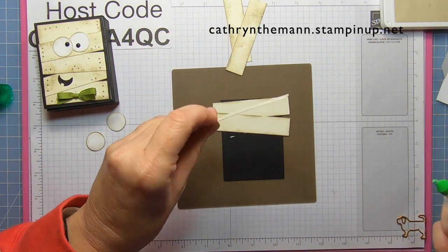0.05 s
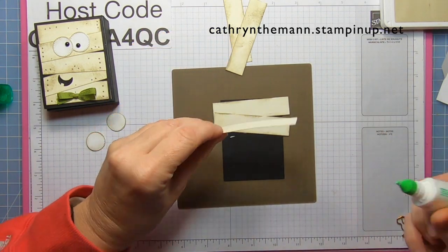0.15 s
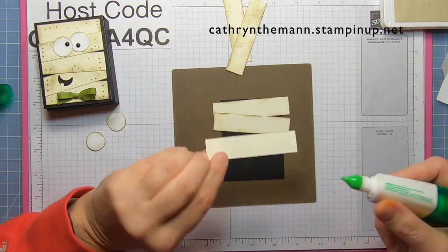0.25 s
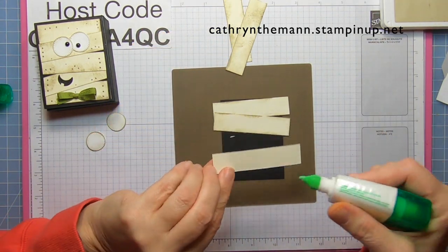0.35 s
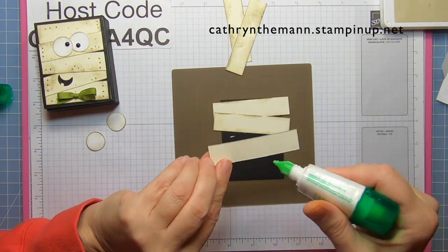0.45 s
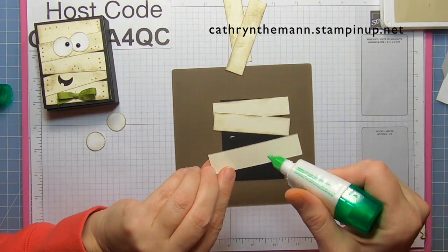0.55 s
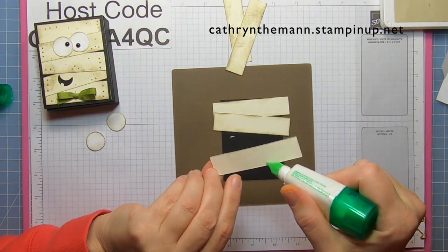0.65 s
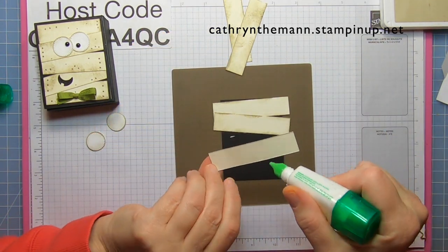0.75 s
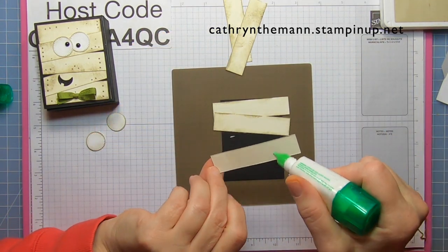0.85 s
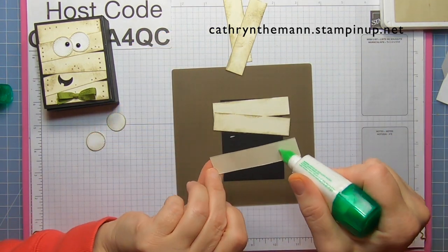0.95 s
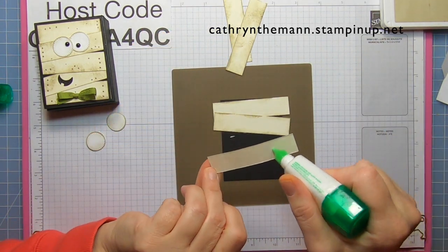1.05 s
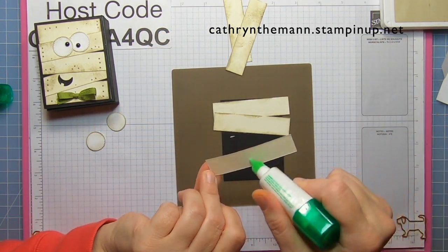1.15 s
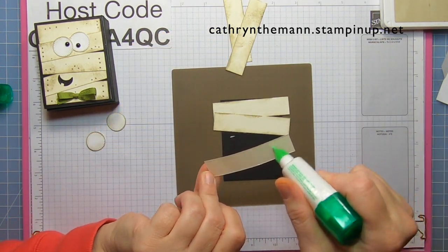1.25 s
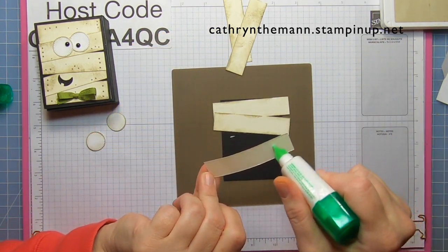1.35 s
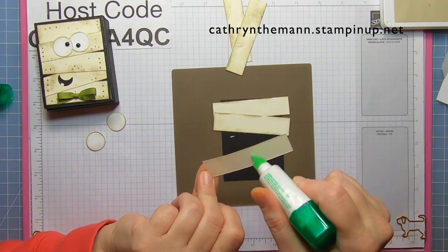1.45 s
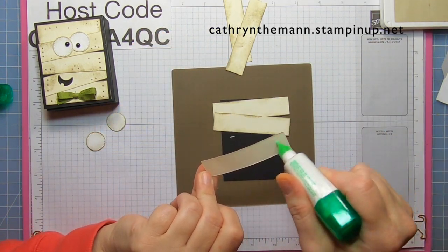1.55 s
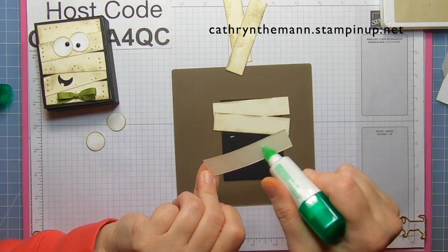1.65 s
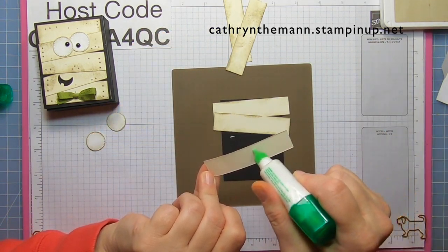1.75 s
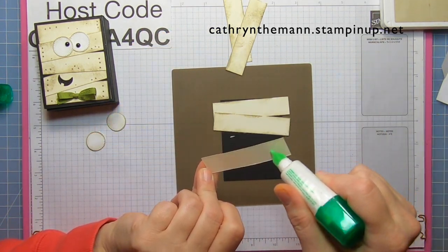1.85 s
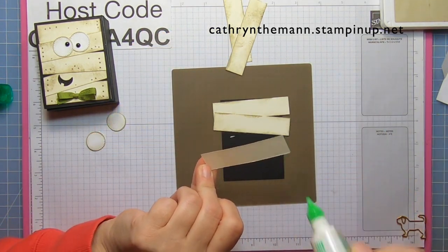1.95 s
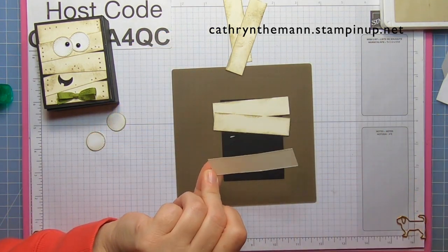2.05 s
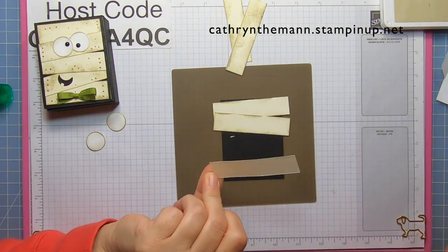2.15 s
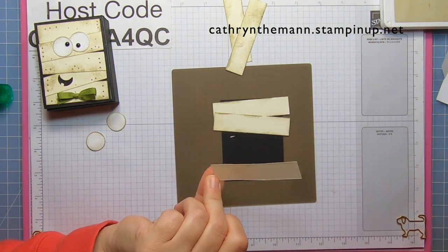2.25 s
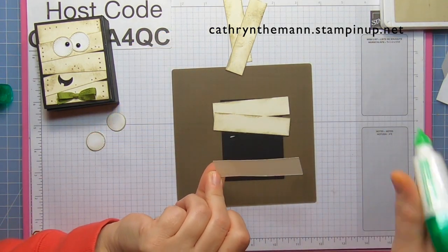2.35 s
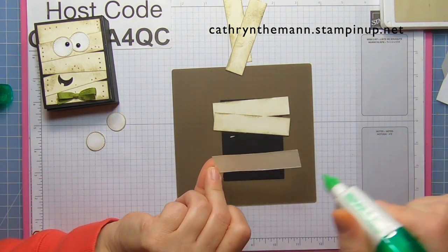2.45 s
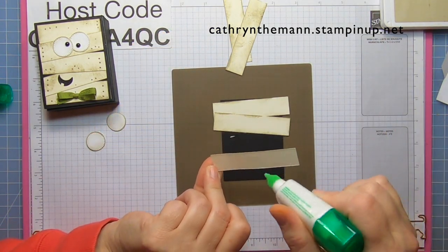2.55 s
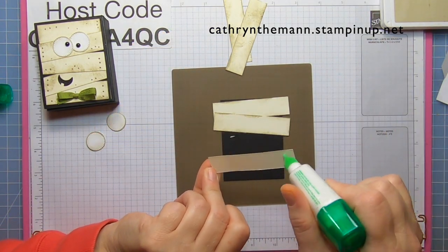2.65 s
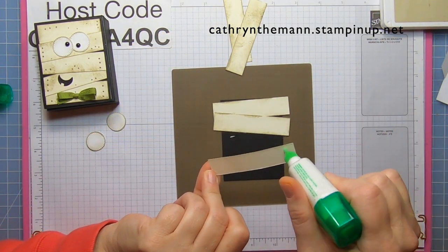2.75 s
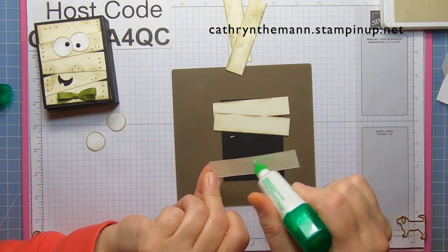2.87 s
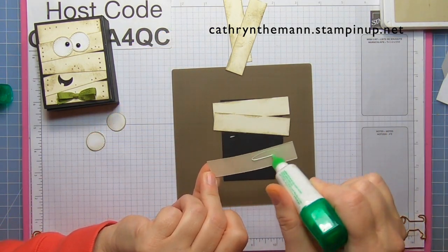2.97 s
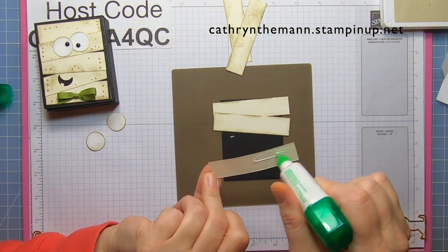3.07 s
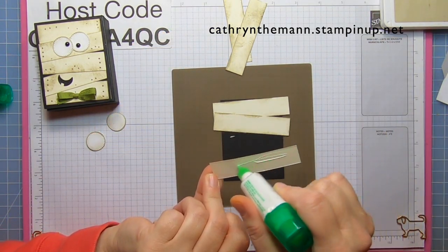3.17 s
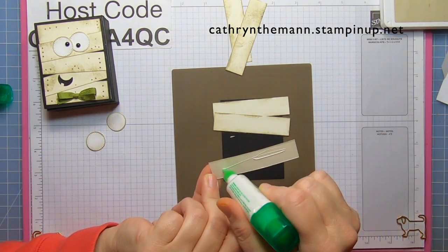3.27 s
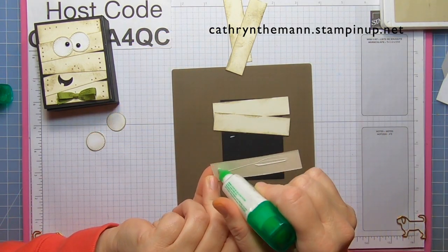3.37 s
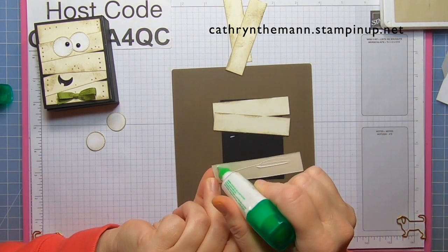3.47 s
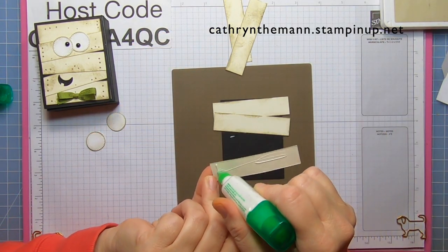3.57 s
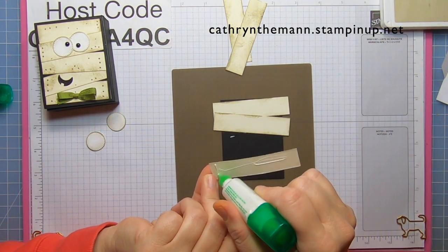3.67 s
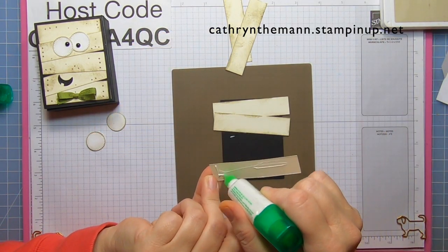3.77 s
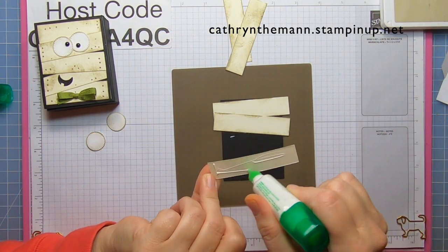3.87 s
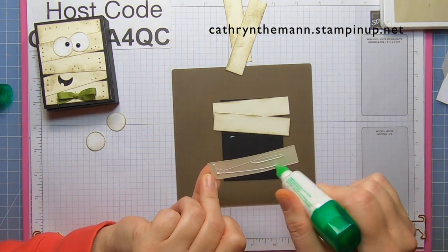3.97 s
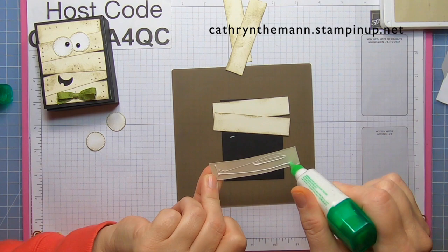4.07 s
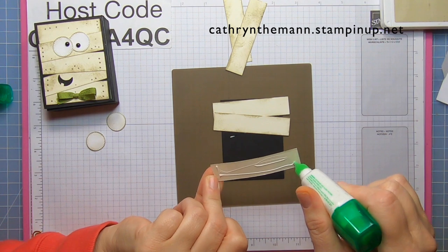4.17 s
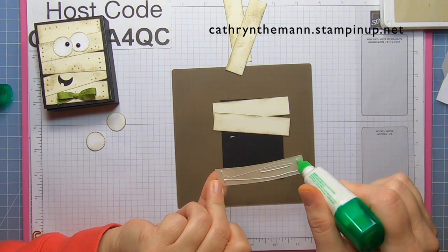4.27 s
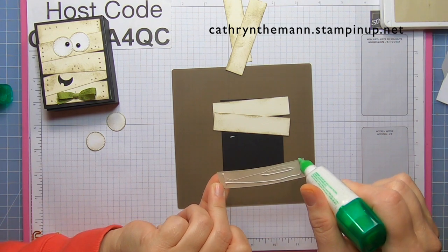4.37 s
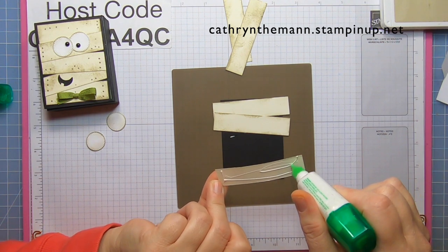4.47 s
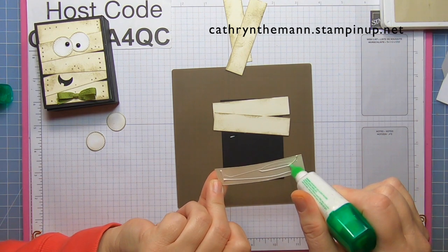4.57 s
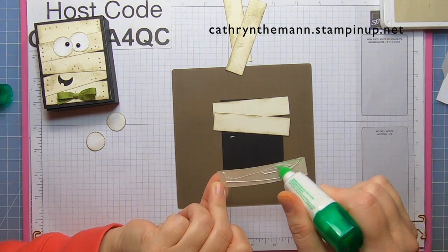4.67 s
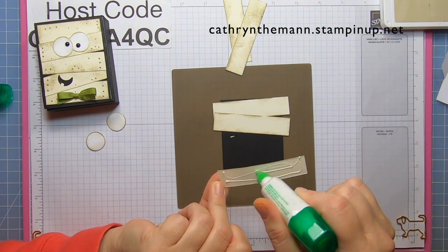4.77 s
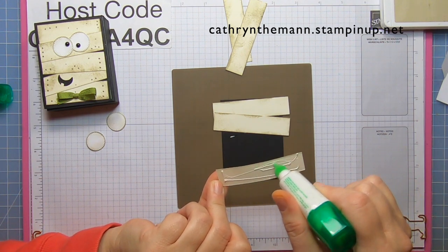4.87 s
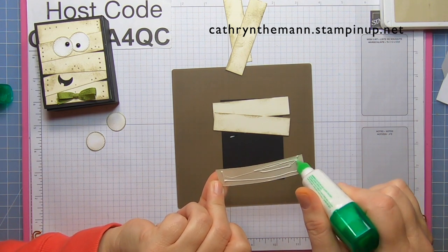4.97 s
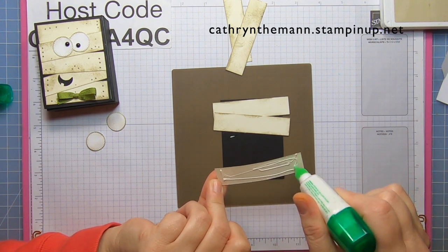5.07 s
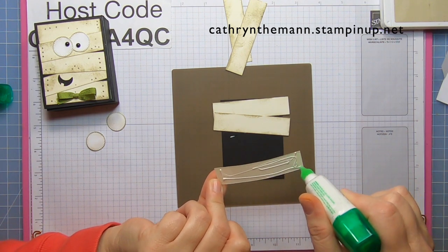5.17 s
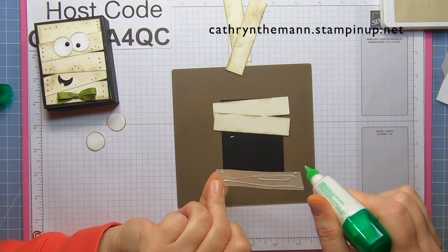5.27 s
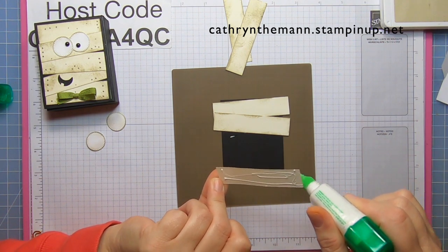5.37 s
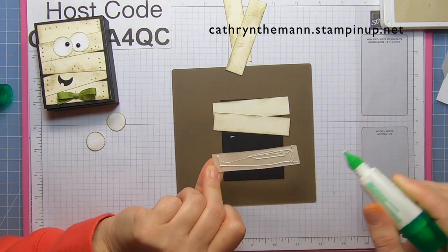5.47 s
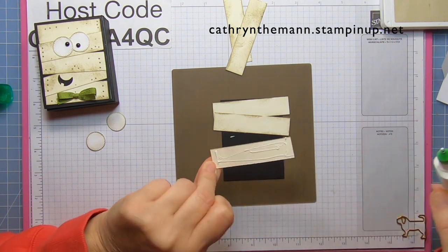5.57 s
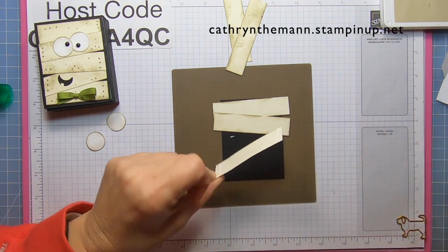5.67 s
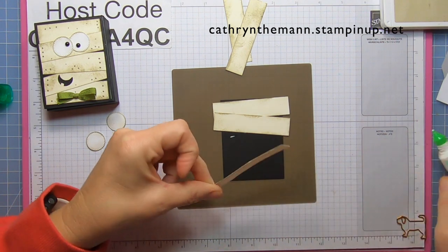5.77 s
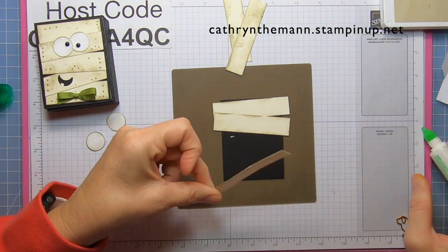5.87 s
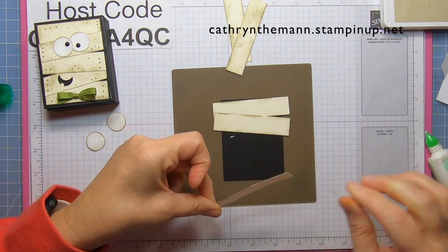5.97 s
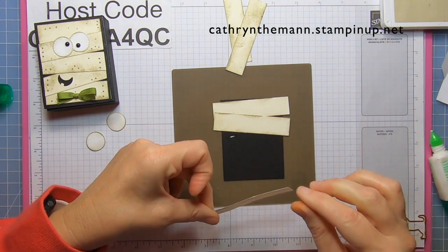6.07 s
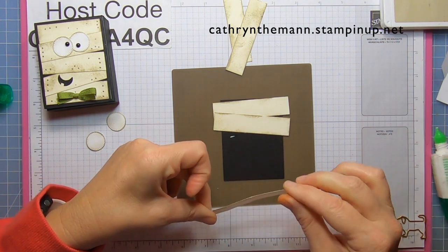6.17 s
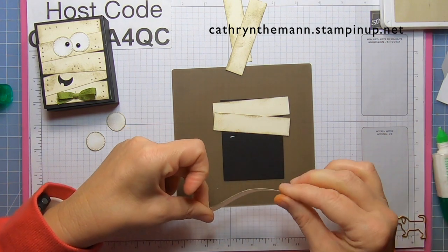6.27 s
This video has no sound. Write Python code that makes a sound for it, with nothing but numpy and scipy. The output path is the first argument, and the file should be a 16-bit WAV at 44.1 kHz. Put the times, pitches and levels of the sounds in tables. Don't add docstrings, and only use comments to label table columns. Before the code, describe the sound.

A small stereo microphone hangs close over a craft table in a quiet room with airy ventilation and faint low hum. From 0 to 0.7 s fingers rustle a stiff card strip, with small clicks and dull taps around 0.25-0.65. At 1.1-1.95 s a glue nozzle scrapes to and fro in six quick strokes, gritty, bright, with brief squeaky slides, growing lighter. Around 1.9-2.35 come clicks, taps and crisp card snaps with light rustling. Clicks at 2.75 lead into four short scrapes until 3.3. After near quiet, a slow soft drag lasts from 3.83 to 4.18, then faint dabs, firmest at 4.92. Taps at 5.4 precede a dense flurry of sharp snaps at 5.5-5.77. A hollow bottle knocks loudly at 5.86, again at 5.96 and 6.05, with a low table boom. Slight rustle and small ticks end it by 6.3.

```python
import sys
import numpy as np
from scipy import signal
from scipy.fft import rfft, irfft
from scipy.io import wavfile
from scipy.ndimage import uniform_filter1d

SR = 44100
rng = np.random.default_rng(int(sys.argv[2]) if len(sys.argv) > 2 else 0)


def to_wav(s):
    ch = np.atleast_2d(s).T
    pcm = np.round(np.clip(ch, -1, 1) * 32767)
    wavfile.write(sys.argv[1], SR, pcm.astype(np.int16))


N = 278800

# f/Hz, density/dB
ROOM_COLOUR = [(18, -58), (30, -4), (64, -12.5), (88, -19), (173, -1.5), (213, -7.5), (292, -9.5),
               (561, -22.5), (767, -11), (1020, -22), (1910, -26.5), (5590, -33), (6210, -32.5),
               (13600, -46.5), (15500, -85)]
# f/Hz, swell/dB
GUST_SWELL = [(60, -0.5), (300, 2.5), (900, 1.6), (3000, 0.5)]
# f/Hz, level/dB
ROOM_WIDTH = [(60, -1), (130, 0.5), (290, 0.5), (640, 9.5), (1410, 11), (3100, -5), (6820, 0),
              (15000, -1.5)]
# f/Hz, level/dB rms
HUM = [(57.5, -65), (118, -84), (178, -102), (240, -68.5), (296, -78), (358, -83)]
# t/s, length/s, level/dB, fade/dB, brightness/dB per octave above 3 kHz
RUSTLES = [(0.0, 0.078, -49, -1.2, 1), (.075, 0.18, -50.5, -9.5, 3), (.255, 0.21, -48.5, -22.5, 2),
           (.45, .11, -44.5, -20.5, 0.5), (.565, 0.037, -55, 8.5, 0.5), (.61, 0.13, -56, -1, 0.5),
           (.725, 0.6, -55, -7, -5), (1.035, 0.093, -50, -18, -1), (1.98, 0.63, -57.5, -1, -1),
           (2.205, 0.087, -57, -16.5, 8), (2.33, 0.1, -62, -5, 2), (2.42, 0.18, -55.5, -14, 1),
           (2.78, .5, -67.5, 7, 2.5), (4.2, 0.98, -65.5, -8, -14), (5.0, 0.094, -52, -4, -4),
           (5.46, .18, -71, 14, 6.5), (5.64, .02, -64, -3, 6), (5.66, .16, -61.5, -9.5, 7.5),
           (5.825, 0.025, -46.5, 3.5, -15), (6.15, 0.16, -84.5, 34, -1.5)]
# f/Hz, level/dB
RUSTLE_COLOUR = [(300, -12), (700, -1.5), (1000, 0.5), (1400, -3.5), (2050, -1), (2700, -6), (5300, -8),
                 (6500, -9.5), (8300, -10.5), (10500, -16), (12500, -20), (15000, -7.5)]
# t/s, length/s, from f/Hz, to f/Hz, level/dB
SINGS = [(1.11, 0.059, 3550, 2360, -45.5), (1.171, 0.02, 3840, 3300, -49), (1.105, 0.09, 770, 1010, -59),
         (1.248, 0.064, 3300, 2920, -50.5), (1.295, 0.041, 3230, 3620, -55),
         (1.334, 0.039, 2240, 3370, -54), (1.242, 0.093, 1440, 790, -55.5), (1.412, 0.053, 3780, 3000, -55),
         (1.574, 0.029, 737, 886, -54), (1.569, 0.086, 1425, 1100, -64), (1.578, 0.024, 3230, 3300, -47),
         (1.664, 0.044, 3150, 2670, -55.5), (1.711, 0.033, 3260, 2800, -51.5),
         (1.718, 0.087, 1860, 1840, -70), (1.844, 0.092, 3040, 3300, -52.5), (1.878, 0.05, 2500, 2200, -65),
         (2.914, 0.051, 933, 1160, -59.5), (2.972, 0.083, 770, 1240, -60), (2.997, 0.11, 3230, 3640, -49.5),
         (3.049, 0.065, 2000, 2400, -53.5), (3.052, 0.048, 1020, 1260, -62), (3.14, .06, 950, 830, -77),
         (3.225, 0.074, 1370, 870, -65), (2.823, 0.1, 5200, 5400, -62.5), (0.0, 0.26, 1870, 1960, -58.5),
         (0.024, 0.15, 8300, 8100, -60.5), (0.597, 0.19, 2200, 2400, -63), (0.755, 0.27, 2420, 2100, -71),
         (0.67, 0.05, 2800, 3000, -66), (1.115, .06, 5600, 5200, -54), (1.26, .05, 5500, 5300, -54),
         (1.39, .11, 5300, 5400, -59), (0.756, 0.23, 5250, 5200, -72), (3.9, 0.2, 1710, 1420, -62.5),
         (4.936, 0.052, 1800, 1680, -58), (3.916, 0.036, 3640, 3200, -52), (3.873, .06, 3780, 3940, -65),
         (3.907, .04, 2520, 2100, -58), (3.936, 0.032, 1940, 1520, -57.5), (3.97, .12, 5660, 5270, -56),
         (4.08, 0.047, 3000, 3550, -57.5), (4.325, 0.041, 2400, 2330, -64), (5.005, 0.094, 1100, 800, -63),
         (5.227, 0.038, 1290, 1400, -64.5)]
# t/s, peak level/dB, ring f/Hz, crisp edge/dB re peak, left-right/dB
SNAPS = [(2.0322, -35.5, 3500, -3, 1.5), (2.197, -27.5, 2900, 0.5, -6), (2.2078, -52, 1880, -7, 3),
         (2.2405, -30, 4530, -4, -5), (2.217, -50, 2600, 2, -3), (2.32, -36, 1930, -10, -8),
         (2.3238, -39.5, 2940, -12, -8), (5.4984, -42.5, 1680, 3, -16), (5.502, -37.5, 1900, 10.5, 7.5),
         (5.5154, -40, 1860, 4, 13), (5.5323, -29.5, 1700, 2, -12), (5.5717, -20.5, 2400, 0.5, -7),
         (5.5802, -31, 2880, -9, -6), (5.586, -27.5, 2340, 5.5, -2), (5.673, -50, 1300, -9, 3),
         (5.655, -32.5, 2380, -1.5, -4.5), (5.6835, -39, 2020, -1, 4), (5.7349, -27.5, 2380, 2, -4),
         (5.738, -36, 2480, 8, -5), (5.8203, -47, 2620, 15, -2.5), (6.1462, -45, 923, 0, -2),
         (6.246, -43, 2120, -2.5, -4), (5.707, -40, 2290, -15, 3), (0.089, -54.5, 2000, 10, 3),
         (1.127, -44, 3300, -6, 9), (1.13, -44, 3180, -5, -2), (1.29, -44, 3300, -3, 2)]
# t/s, peak level/dB, ring f/Hz, left-right/dB, nozzle/dB re peak
TAPS = [(0.3176, -45.5, 2080, -3, 2), (0.3986, -31.5, 1690, -1.5, -20), (0.4311, -24.5, 1857, 1, -12),
        (0.595, -33, 1990, -1, -4.5), (0.65, -42, 1320, -2, -2), (1.9755, -35, 1690, -3, -29),
        (2.0694, -26, 1880, -5.5, -16), (2.1187, -32, 1835, -4, -19), (2.478, -54, 1070, -1, -5),
        (3.043, -44, 1510, 0, 16), (5.3687, -32.5, 1330, 2, -32), (5.438, -44.5, 1670, 3, -26),
        (6.283, -39.5, 876, -5, -9)]
# t/s, peak level/dB, ring f/Hz, left-right/dB, nozzle/dB re peak
CLICKS = [(0.2467, -35.5, 1140, 12, -10), (0.423, -28, 1066, -12, -28), (0.4822, -32, 1990, -2, -16),
          (1.02, -38, 1210, 2, -8.5), (1.0267, -38.5, 2320, 1, -10), (1.356, -45, 3300, -4, 6),
          (1.8839, -32.5, 2530, 0, -1), (2.226, -44, 2190, -6, -4), (2.311, -57, 905, 18, -12),
          (2.465, -48, 1170, -6, -2), (2.7293, -32, 1030, 1.5, -1), (2.7332, -34, 1900, 0, -2),
          (2.768, -27.5, 1890, 2.5, -5), (2.783, -44, 1880, 1.5, -9), (2.799, -48, 2050, 6, -15),
          (5.006, -46, 1290, -5, -2), (5.7653, -37, 1180, -3, -6), (3.093, -42, 2340, 4, 8.5),
          (3.152, -40, 3270, 1, -11), (5.522, -35, 1810, -2, -6), (5.543, -23, 1940, -1.5, -3),
          (5.6941, -41, 2280, -9, -3), (5.7456, -37, 2220, -16, -6), (5.7551, -25.5, 3530, -4.5, -10)]
# f/Hz, level/dB
CRISP_COLOUR = [(1500, -37), (3000, -10.5), (5500, 7), (7000, 5.5), (8300, 8.5), (10000, -2), (12500, 2),
                (15500, -13)]
# f/Hz, level/dB, t60/s
NOZZLE_FLICK = [(3300, 2, 0.0082), (5400, 5, 0.0038), (8300, -5.5, 0.0055)]
# t/s, level/dB
BUMPS = [(0.247, -53.5), (0.425, -41), (0.648, -52.5), (1.034, -57.5), (2.28, -55.5), (5.06, -55.5),
         (5.67, -57), (5.829, -75), (5.975, -57), (6.082, -51), (6.114, -52)]
# t/s, blow level/dB, table share/dB, click share/dB, bottle pitch factor
KNOCKS = [
    (5.853, -52, 8, -27, 0.19),
    (6.0434, -43, -1, 0, 0.57),
    (5.8551, -7, -22, -7.5, 1),
    (5.8697, -24, -6, -11, 1.02),
    (5.953, -33.5, 4, 0, 0.8),
    (5.9599, -21, -10.5, -1, 0.92),
    (6.0482, -14, -9.5, -16, 0.94),
]
# t/s, level/dB
THUMPS = [
    (5.67, -44),
    (5.855, -43),
    (5.872, -27),
    (5.953, -27),
    (5.9594, -24.5),
    (6.0502, -34),
]
# f/Hz, level/dB, t60/s
BOTTLE_MODES = [(940, -15, 0.06), (1140, -6, 0.045), (1330, 5, 0.012), (1350, -5, 0.045), (1545, -6, 0.04),
                (1760, -18, 0.05), (1925, -18, 0.07), (2330, -21, 0.05), (2700, -19, 0.04),
                (2990, -6, 0.016), (3110, -11, 0.025), (3430, -7, 0.016), (3908, -17, 0.04)]
# f/Hz, level/dB, t60/s
TABLE_MODES = [(143, -8, 0.29), (189.3, 8, 0.17), (217.8, 8.5, 0.19), (258, 12, 0.1), (312, 9, 0.16),
               (380, -6, 0.11), (441, 2, 0.1), (474, 7.5, 0.1), (522, 17, 0.032), (643, -14.5, 0.07),
               (708, 16, 0.037), (782, 19.5, 0.03)]
# f/Hz, level/dB, t60/s
LEG_MODES = [(58, 2, 0.081), (75, 9, 0.097), (112, 13, 0.052)]
# t/s, length/s, pressure/dB, moment of most pressure 0-1, brightness/dB per octave
ZIGZAG = [
    (1.098, 0.13, -39.5, 0.43, -0.5),
    (1.228, 0.16, -40.5, 0.47, 1.5),
    (1.383, 0.16, -46.5, 0.28, 4.5),
    (1.529, 0.14, -42, 0.53, 6.5),
    (1.667, 0.13, -42.5, 0.23, 5.5),
    (1.785, 0.18, -49.5, 0.56, 4.5),
]
# t/s, length/s, pressure/dB, moment of most pressure 0-1, brightness/dB per octave
SPREAD = [
    (2.815, 0.072, -53, 0.36, -5),
    (2.902, 0.067, -47, 0.46, 2.5),
    (2.97, 0.14, -40, 0.64, 2),
    (3.112, 0.099, -47, 0.29, -3.5),
    (3.199, 0.11, -54.5, 0.26, -0.5),
    (4.278, 0.14, -60.5, 0.2, -4),
]
# t/s, length/s, pressure/dB, moment of most pressure 0-1, brightness/dB per octave
DABS = [
    (3.62, 0.074, -72.5, 0.39, 14.5),
    (4.475, 0.024, -65, 0.44, -12),
    (4.512, 0.04, -56, 0.23, -0.5),
    (4.71, 0.056, -67.5, 0.38, 3),
    (4.787, 0.067, -61.5, 0.18, 0),
    (4.923, 0.064, -42.5, 0.52, -0.7),
    (4.997, .05, -48.5, 0.2, -1.5),
    (5.135, 0.04, -66, 0.39, 9),
    (5.224, 0.055, -55.5, 0.54, 4.5),
]
# t/s, pressure/dB, brightness/dB per octave, extra table rub/dB
DRAG = [
    (3.83, -73, 2, -11),
    (3.894, -56, -1, 6),
    (3.942, -50, 2, 6),
    (4.02, -50.5, 0.5, -2),
    (4.078, -52.5, 5, -6),
    (4.101, -55.5, -3, -8),
    (4.18, -77, 7, -4),
]
# f/Hz, width/Hz, level/dB
NOZZLE = [(2900, 900, 10.5), (3300, 600, 11.5), (4550, 500, 5.5), (5410, 810, 12.5), (5900, 670, 4.5),
          (7300, 1100, 7.5), (8400, 750, 0.1), (9510, 1360, -3), (11800, 2700, -12)]
# f/Hz, width/Hz, level/dB
TABLE_RUB = [(946, 154, -2.5), (1198, 136, -4.5), (1353, 233, 3), (1970, 1180, 5.5), (2400, 480, -4.5)]
# f/Hz, left-right/dB
BOTTLE_PAN = [(60, 2.5), (450, -0.5), (600, -5.5), (1500, -8), (4000, -2.5), (10000, -2.5)]
# f/Hz, lead/rad
PORT_LEAD = [(100, 0), (3600, .1), (5000, -1.2), (9000, -1.3), (11000, -2.8), (14000, -3.3)]
# f/Hz, t60/s
ROOM_DECAY = [(200, 0.12), (1000, 0.18), (4000, 0.094), (10000, 0.1)]
# f/Hz, level/dB
MIC_COLOUR = [(20, -36), (50, 0.5), (9300, 0), (10800, -5.5), (11800, -6.5), (14000, -16.5), (15300, -28),
              (15750, -65), (22000, -70)]


def gain_of(db):
    return 10 ** (np.asarray(db) / 20)


def evened(x):
    return x / np.sqrt(np.mean(x ** 2) + 1e-20)


def read(points, hz):
    f, value = np.transpose(points)
    return np.interp(np.log(hz + 1), np.log(f + 1), value)


def add(mix, s, sound):
    part = mix[..., round(s * SR):][..., :sound.shape[-1]]
    part += sound[..., :part.shape[-1]]


def coloured(x, points):
    hz = np.fft.rfftfreq(x.shape[-1], 1 / SR)
    return irfft(rfft(x) * gain_of(read(points, hz)), x.shape[-1])


def resonate(x, hz, width, count=2):
    turn = np.exp(2j * np.pi * np.cumsum(hz * np.ones(len(x))) / SR)
    r = np.exp(-np.pi * width / SR)
    smooth = signal.lfilter([(1 - r) ** count], np.poly([r] * count), x / turn)
    return 2 * (turn * smooth).real


def wander(seconds):
    size = max(round(seconds * SR), 2)
    return evened(uniform_filter1d(uniform_filter1d(rng.standard_normal(N), size), size))


def grit(grain_db):
    slip_db = grain_db * np.minimum(rng.exponential(1, N), 5)
    return evened(rng.standard_normal(N) * gain_of(slip_db))


def played(rows, shape):
    level_db, last, gate = np.zeros((3, N))
    for s, length, db, form, value in rows:
        inside = slice(round(s * SR), round((s + length) * SR))
        progress = np.linspace(0, 1, len(gate[inside]))
        level_db[inside] = db + shape(progress, form)
        last[inside] = value
        gate[inside] = 1
    return level_db, last, uniform_filter1d(gate, size=600, mode="nearest") * gate


def ring(modes, t, rise):
    total = sum(gain_of(db - 60 * t / t60) * np.sin(2 * np.pi * hz * t) for hz, db, t60 in modes)
    return total * (1 - np.exp(-t / rise))


def led(pair, radians, pan_db=0):
    way = .5 * np.array([[1], [-1]])
    return irfft(rfft(pair) * np.exp(1j * radians * way) * gain_of(pan_db * way), pair.shape[-1])


def room_tone():
    frames, hz = N // 512 + 5, np.fft.rfftfreq(2048, 1 / SR)
    a, b, c, d, patches = rng.standard_normal((frames, 1025, 5)).T
    patches = uniform_filter1d(uniform_filter1d(patches, size=14, axis=0), size=8, axis=1)
    patches_db = 1.62 * evened(patches)
    gusts = np.clip(evened(uniform_filter1d(rng.standard_normal(frames), size=7)), -2, 1.3)
    gusts_db = gusts * read(GUST_SWELL, hz)[:, None]
    noise = np.array([a + 1j * b, (c + 1j * d) * gain_of(read(ROOM_WIDTH, hz))[:, None]])
    noise = noise * gain_of(read(ROOM_COLOUR, hz)[:, None] + patches_db + gusts_db)
    mid, side = signal.istft(noise, nperseg=2048, noverlap=1536)[1][:, :N]
    air = gain_of(-59.5) * np.array([mid + side, mid - side]) / np.std(mid)
    turns = np.cumsum(1 + 0.01075 * wander(0.15)) / SR
    waver = gain_of(.8 * wander(.08))
    hum = 0
    for f, db in HUM:
        hum = hum + gain_of(db) * waver * np.sqrt(2) * np.sin(2 * np.pi * (f * turns + rng.random()))
    return air + hum


def rustle():
    level_db, bright_db, gate = played(RUSTLES, np.multiply)
    near, far = (evened(coloured(grit(0.79), RUSTLE_COLOUR)) for _ in range(2))
    pair = np.array([near + 0.74 * far, near - 1.0 * far])
    below_7k, below_3k = (signal.sosfilt(signal.butter(2, hz, fs=SR, output="sos"), pair)
                          for hz in (7000, 3300))
    middle, top = below_7k - below_3k, pair - below_7k
    pair = below_3k + gain_of(bright_db) * middle + gain_of(2 * bright_db) * top
    return gate * gain_of(level_db - 3.0 + 1.3 * wander(0.0081)) * pair


def sings():
    out, drive = np.zeros(N), grit(3.4)
    for s, length, from_hz, to_hz, db in SINGS:
        u = np.linspace(0, 1, round(length * SR))
        hz = from_hz + (to_hz - from_hz) * u
        share = .045 + .9 * max(length - .1, 0)
        band = resonate(drive[round(s * SR):][:len(u)], hz, share * hz.mean() + 40)
        add(out, s, gain_of(db) * np.sin(np.pi * u) ** 0.44 * evened(band))
    return out


def snaps():
    out, t = np.zeros((2, N)), np.arange(3000) / SR
    rows = [(s, db, hz, -15, 0.64, pan, tip) for s, db, hz, pan, tip in TAPS]
    rows += [(s, db, hz, -8, 0.59, pan, tip) for s, db, hz, pan, tip in CLICKS]
    rows += [(s, db, hz, crisp, 0.67, pan, -25) for s, db, hz, crisp, pan in SNAPS]
    noise, flick = rng.standard_normal((len(rows), 2, 3000)), ring(NOZZLE_FLICK, t, 0.00014)
    crack_colour = [(300, -25.0), (1100, -4), (2500, -2.0), (4500, -4.5), (9000, -16.5)]
    crack_fade = gain_of(-7.0 - 60 * t / 0.017) + gain_of(-10.5 - 60 * t / 0.088)
    edge_fade = gain_of(-1.05 - 60 * t / 0.0084) + gain_of(-19 - 60 * t / 0.056)
    for (s, peak_db, hz, crisp_db, share, pan_db, tip_db), (n1, n2) in zip(rows, noise):
        t60 = np.interp(crisp_db, [-12, -2], [.03, .012])
        tone = ring([(hz, -1.5, t60), (hz * 1.06, -17, 3 * t60)], t, .0004)
        crack = evened(coloured(n1, crack_colour)) * crack_fade
        shift = 1 + .05 * np.tanh(n1[0])
        edge = evened(coloured(n2, [(f * shift, db) for f, db in CRISP_COLOUR])) * edge_fade
        sound = share * tone + (1 - share) * crack + gain_of(crisp_db) * edge + gain_of(tip_db) * flick
        sound = np.pad(sound, 8)
        pair = gain_of(peak_db + pan_db * np.array([[.5], [-.5]])) * sound
        lead = read(PORT_LEAD, np.fft.rfftfreq(len(sound), 1 / SR))
        add(out, s, led(pair, lead * np.clip(pan_db / -2.5, -1, 1)))
    return out


def knocks():
    out, t = np.zeros(N), np.arange(14000) / SR
    noise = rng.standard_normal((len(KNOCKS), 14000))
    detune = 1 + .025 * rng.standard_normal((len(KNOCKS) + len(BUMPS), len(TABLE_MODES)))
    booms = []
    for row in detune:
        modes = [(f * d, db, t60) for (f, db, t60), d in zip(TABLE_MODES, row)]
        booms.append(ring(modes, t, 0.0027))
    for (s, blow_db, table_db, click_db, pitch), n, boom in zip(KNOCKS, noise, booms):
        bottle = -0.56 * ring(BOTTLE_MODES, t * pitch, 0.00089) * (0.47 + gain_of(-60 * t / 0.04))
        click = evened(resonate(n, 1910, 3940))
        click *= gain_of(-60 * t / 0.0093) + gain_of(-27.5 - 60 * t / 0.29)
        hiss = evened(np.diff(n, n=6, prepend=np.zeros(6)))
        click += hiss * gain_of(-11 - 60 * t / 0.03)
        rattle = evened(resonate(n[::-1], 1500, 760, count=1)) * gain_of(-20.5 - 60 * t / 0.072)
        thud = evened(resonate(np.roll(n, 5000), 290, 360, count=1))
        thud *= gain_of(5.5 - 60 * t / 0.12) * (1 - np.exp(-t / 0.0023))
        table = 0.27 * gain_of(table_db) * (boom + thud)
        add(out, s, gain_of(blow_db) * (bottle + rattle + gain_of(click_db) * click + table))
    for s, db in THUMPS:
        add(out, s, gain_of(db) * ring(LEG_MODES, t, 0.025))
    for (s, db), boom in zip(BUMPS, booms[::-1]):
        bump = 0.33 * boom + 0.19 * ring(LEG_MODES, t, 0.014)
        add(out, s, gain_of(db - 60 * t / 2.5) * bump)
    return out


def arch(u, top):
    top = np.clip(top, .05, .95)
    away = np.maximum((top - u) / top, (u - top) / (1 - top))
    return -26 * away ** (1.51 + 7.5 * len(u) / SR)


def scrape():
    strokes = ZIGZAG + SPREAD + DABS
    pressure_db, air_db, gate = played(strokes, arch)
    rub_levels = [(ZIGZAG, -57.5), (SPREAD, -53.5), (DABS, -56)]
    rub_db = sum(db * (played(rows, arch)[2] > 0) for rows, db in rub_levels)
    progress = played([(s, length, 0, 1, 0) for s, length, *_ in strokes], np.multiply)[0]

    when, drag_db, drag_air_db, drag_rub_db = np.transpose(DRAG)
    t = np.arange(round(when[0] * SR), round(when[-1] * SR))
    pressure_db[t] = np.interp(t / SR, when, drag_db)
    air_db[t] = np.interp(t / SR, when, drag_air_db)
    rub_db[t] = -52.5 + np.interp(t / SR, when, drag_rub_db)
    gate[t], progress[t] = 1, np.linspace(0, 1, len(t))

    drive = grit(1.1) * gain_of(2.0 * wander(0.0018))
    tip, sink = 0, 1.03 - 0.054 * progress + 0.028 * wander(0.014)
    for f, width, db in NOZZLE:
        level_db = db + air_db * np.log2(f / 4500) + 2.7 * wander(0.018)
        tip = tip + gain_of(level_db) * evened(resonate(drive, f * sink ** (4500 / f), width))
    back = np.arange(N) - SR * 0.001058 * np.exp(0.317 * wander(0.0625))
    tip = tip + .35 * np.interp(back, np.arange(N), tip)

    sway = 1.05 - 0.068 * progress + 0.046 * wander(0.056)

    def table_under(x):
        return evened(sum(gain_of(db + 2.6 * wander(0.039)) * evened(resonate(x, f * sway, width))
                          for f, width, db in TABLE_RUB))

    rub = table_under(drive) + 0.62 * table_under(grit(1.8)) * np.array([[1], [-1]])
    rub = gain_of(rub_db - pressure_db + 0.42 * (pressure_db + 37.5)) * rub
    return gate * gain_of(pressure_db) * (evened(tip) * gain_of([[-.3], [.3]]) + rub)


def echoes(x):
    taps = np.zeros((2, 16000))
    at = np.arange(200, 15900, 20) + rng.integers(0, 20, (2, 785))
    np.put_along_axis(taps, at, rng.choice([-1., 1.], at.shape), 1)
    hz, t, z = signal.stft(taps, SR, nperseg=256)
    tail = signal.istft(z * gain_of(-60 * t / read(ROOM_DECAY, hz)[:, None]), SR, nperseg=256)[1]
    return signal.fftconvolve(x[None], tail / np.linalg.norm(tail[0]), axes=1)[:, :N]


def scene():
    hz = np.fft.rfftfreq(N, 1 / SR)
    bottle = led(knocks()[None], read(PORT_LEAD, hz), read(BOTTLE_PAN, hz))
    near = bottle + scrape() + snaps() + sings()
    room_colour = [(100, -33), (300, -10.5), (600, -5.5), (1200, -13.5), (1900, -10.0),
                   (3500, -13.0), (10000, -2.5)]
    room = coloured(echoes(near.mean(0)), room_colour)
    return coloured(near + room + rustle(), MIC_COLOUR) + room_tone()


def top_cut(x):
    return signal.sosfilt(signal.butter(12, 15660, fs=SR, output="sos"), x)


def record(dry):
    return top_cut(dry)


dry = scene()
out = record(dry)
to_wav(out)
```